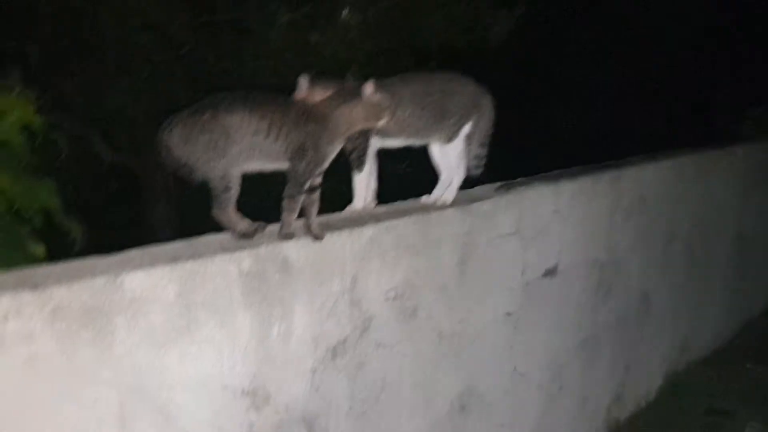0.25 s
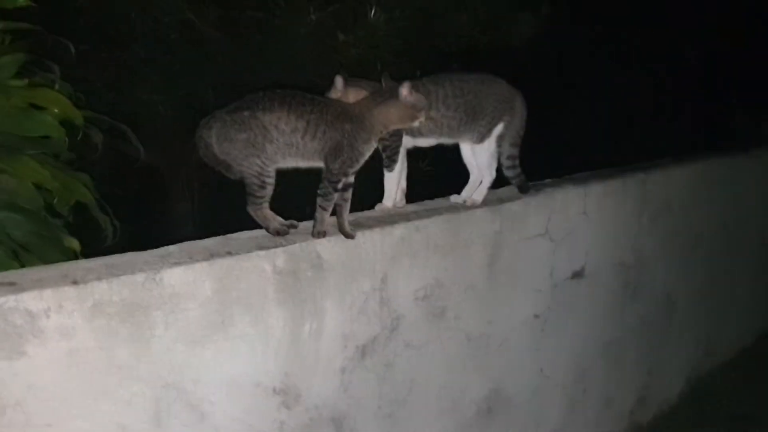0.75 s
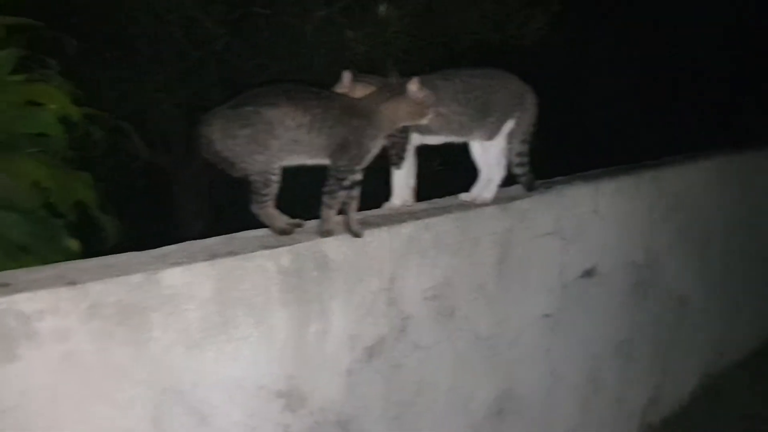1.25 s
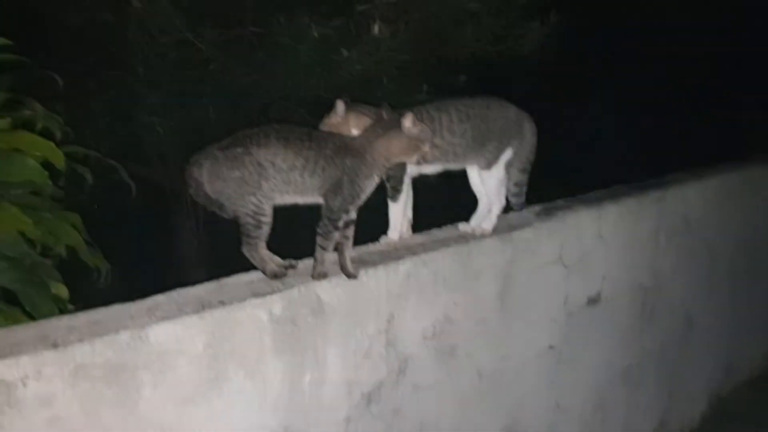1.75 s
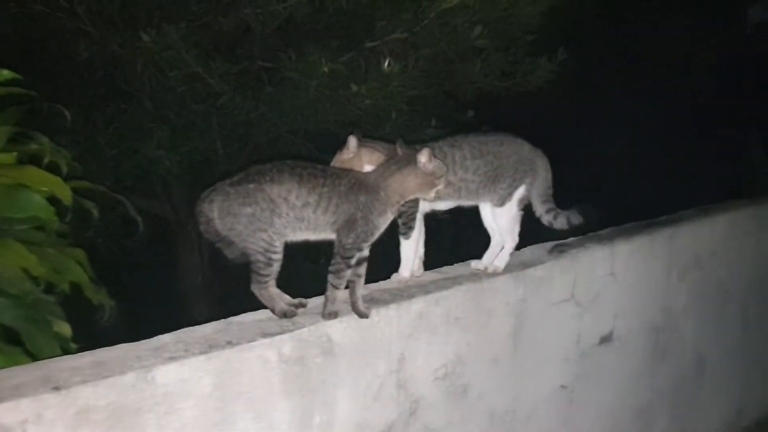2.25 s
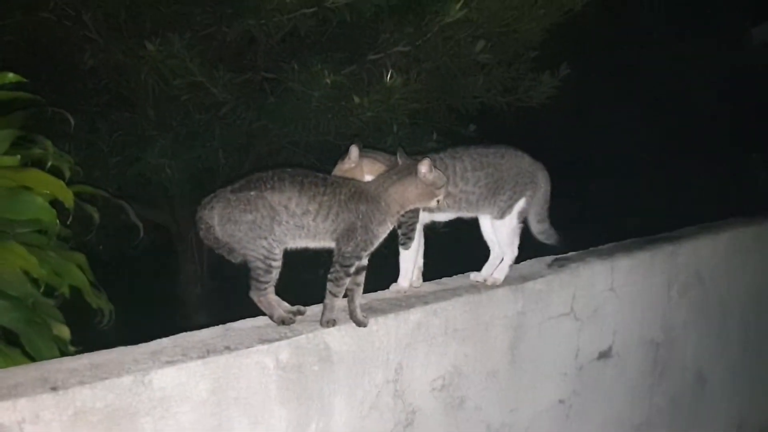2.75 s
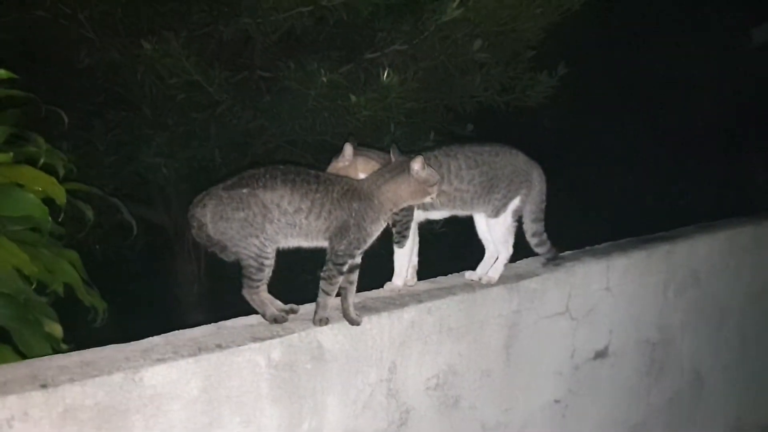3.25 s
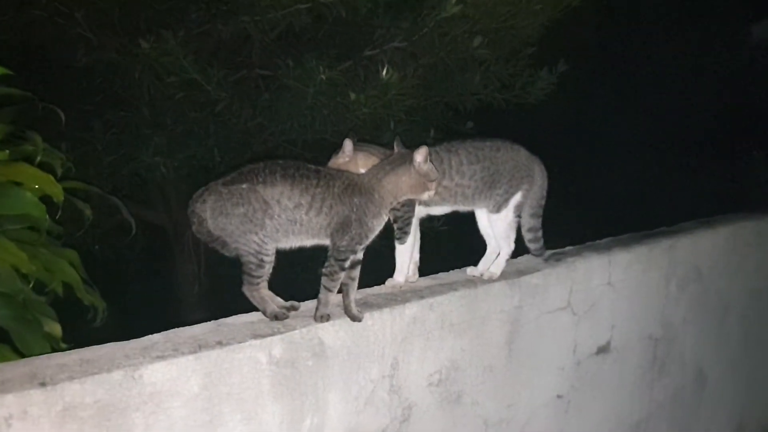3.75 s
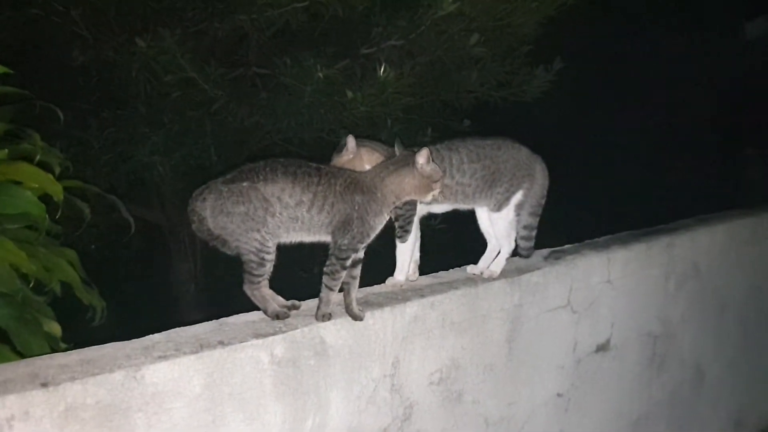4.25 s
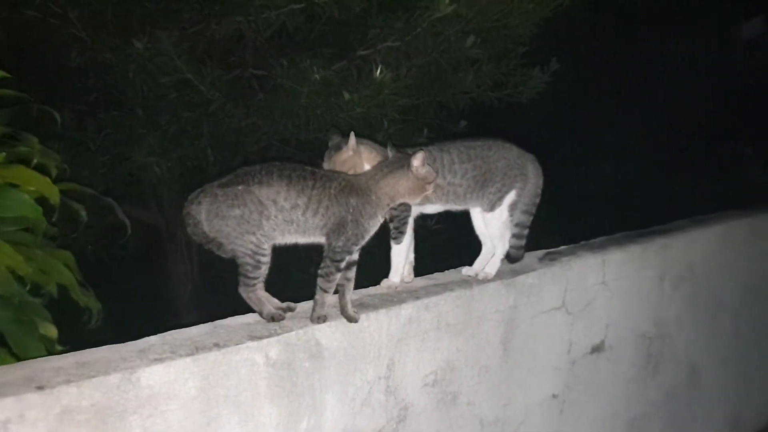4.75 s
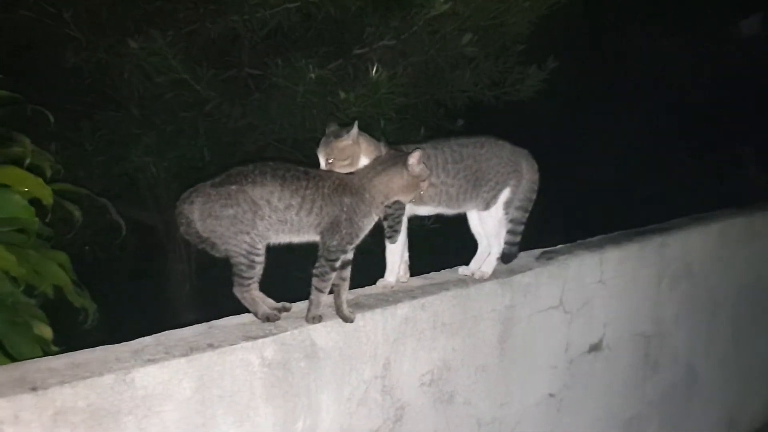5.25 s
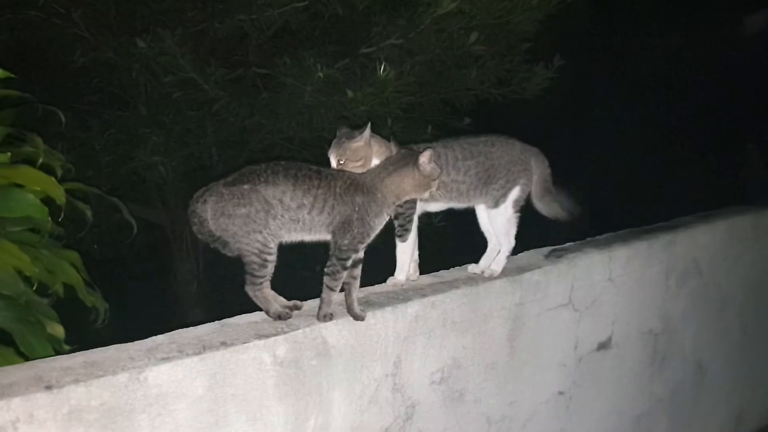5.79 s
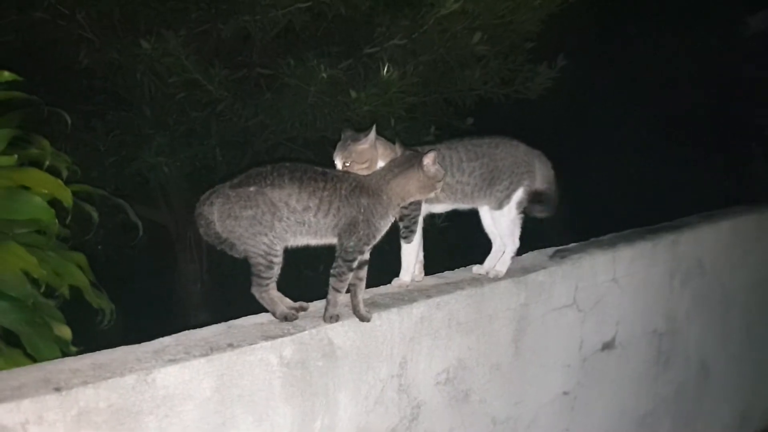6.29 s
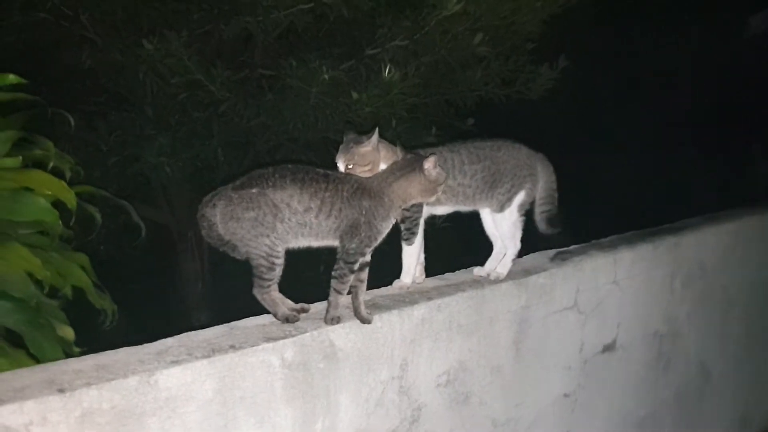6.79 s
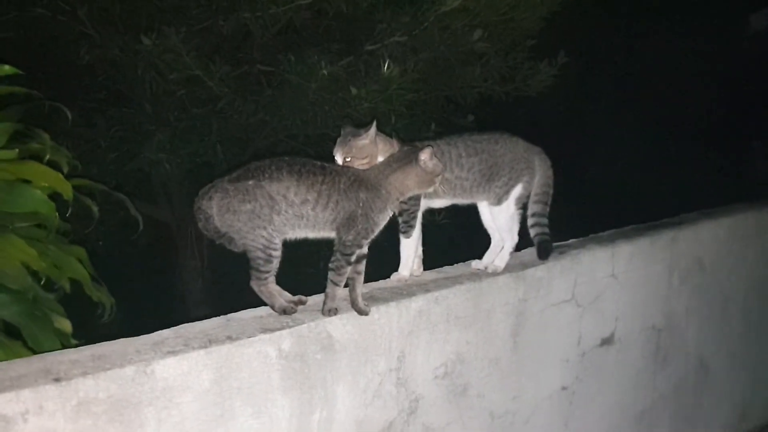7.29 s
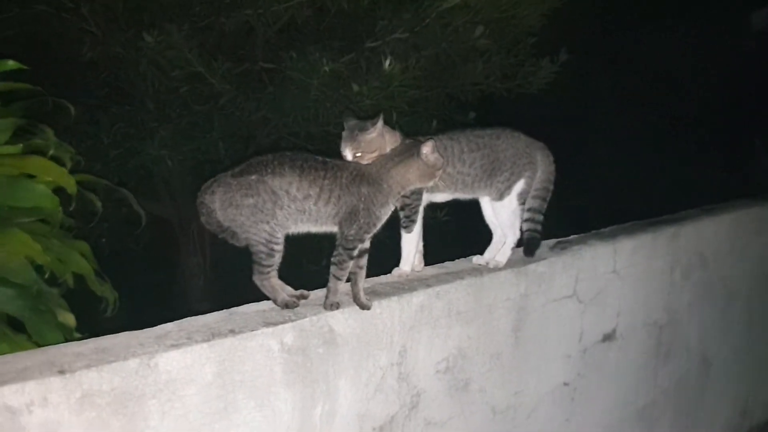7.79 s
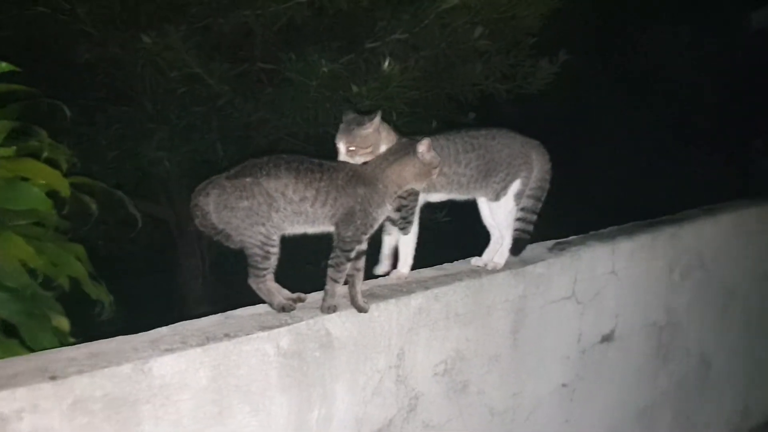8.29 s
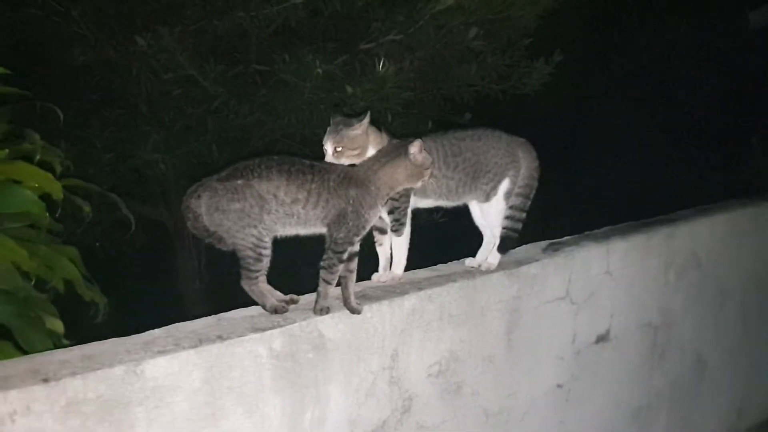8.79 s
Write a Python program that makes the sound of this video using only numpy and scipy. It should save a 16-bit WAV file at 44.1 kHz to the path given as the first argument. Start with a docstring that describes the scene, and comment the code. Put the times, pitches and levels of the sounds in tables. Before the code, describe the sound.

Two cats yowl at each other outdoors at night. After about a second of faint insects, far traffic rumble and two tiny mews, one cat gives three long calls that rise and sink in pitch, while the other overlaps with raspy, nearly level yowls. A frog croaks softly past the middle, and a few small ticks sound nearby. The microphone picks up a slight yard echo.

```python
"""Two cats yowl at each other at night in long, overlapping calls: one arches in pitch, one holds.
Their vocal folds give harmonics, lifted by throat and mouth resonances that rise with the pitch.
Behind them: insects over far traffic rumble, four double croaks from a frog's throat sac,
two faint mews and three ticks. A two-port microphone hears it all with the echoes of a yard."""
import sys
import numpy as np
from scipy import signal
from scipy.fft import rfft, irfft
from scipy.io import wavfile
from scipy.ndimage import uniform_filter1d

SR = 44100
rng = np.random.default_rng(int(sys.argv[2]) if len(sys.argv) > 2 else 0)


def unload_audio(sound):
    """Save the sound as a 16-bit wav file, at the path given as the first command line argument."""
    columns = np.transpose(np.atleast_2d(sound))
    # keep every value between -1 and 1, then stretch to whole-number steps
    steps = np.round(np.clip(columns, -1, 1) * 32767)
    wavfile.write(sys.argv[1], SR, steps.astype(np.int16))


N = 398223


def gain_of(db):
    """dB to amplitude factor."""
    return 10 ** (np.asarray(db) / 20)


def unit_rms(x):
    """Scale to rms 1."""
    return x / np.sqrt(np.mean(x ** 2) + 1e-20)


def at_hz(points, hz):
    """Interpolate (f/Hz, value) rows on a log-frequency axis."""
    f, value = np.transpose(points)
    return np.interp(np.log(hz + 1), np.log(f + 1), value)


def add(mix, start_s, sound):
    """Mix a sound in at start_s."""
    part = mix[round(start_s * SR):][:len(sound)]
    part += sound[:len(part)]


def resonance(hz, centre_hz, width_hz):
    """Peak of gain 1, falling to 1/2 at width_hz off centre."""
    return 1 / (1 + ((hz - centre_hz) / width_hz) ** 2)


def bandpass(x, band_hz, order=2):
    """Butterworth band-pass."""
    return signal.sosfilt(signal.butter(order, band_hz, "bandpass", fs=SR, output="sos"), x)


def wander(count, smooth_s):
    """Smooth random drift, rms 1."""
    span = max(int(smooth_s * SR), 2)
    return unit_rms(uniform_filter1d(uniform_filter1d(rng.standard_normal(count), span), span))


def glide(t, knots_s, value):
    """Cubic curve through the points, flat at each turn."""
    step = np.diff(value) / np.diff(knots_s)
    product = step[1:] * step[:-1]
    inner = np.where(product > 0, 2 * product / (step[1:] + step[:-1] + 1e-9), 0)
    slope = np.concatenate([step[:1], inner, step[-1:]])
    k = np.clip(np.searchsorted(knots_s, t) - 1, 0, len(step) - 1)
    span = knots_s[k + 1] - knots_s[k]
    u = (t - knots_s[k]) / span
    bend = (slope[k] - step[k]) * (1 - u) - (slope[k + 1] - step[k]) * u
    return value[k] + span * u * (step[k] + (1 - u) * bend)


def patchy_noise(gain, correlation, patchy_db):
    """Stereo noise, rms 1, shaped by gain (channel, bin, 1), with drifting patches of level."""
    a, b, c, d, patches = rng.standard_normal((N // 256 + 5, 513, 5)).T
    patches = unit_rms(uniform_filter1d(uniform_filter1d(patches, size=8, axis=0), size=14, axis=1))
    left = a + 1j * b
    right = correlation * left + np.sqrt(1 - correlation ** 2) * (c + 1j * d)
    spectra = np.array([left, right]) * gain * gain_of(patchy_db * patches)
    return unit_rms(signal.istft(spectra, nperseg=1024, noverlap=768)[1][:, :N])


def traffic_and_insects():
    """Far traffic rumble, its bass alike at both ports, and insect bands, independent at each."""
    # f/Hz, relative level/dB
    rumble_spectrum = [(30, -12.5), (52, -0.5), (80, -7), (125, -7), (250, -13.5), (420, -22), (800, -28.5),
                       (1700, -29), (4200, -35), (5500, -58)]
    # f/Hz, left-right correlation
    rumble_correlation = [(60, 0.96), (240, 0.94), (950, -0.078), (3770, -0.18), (15000, 0.24)]
    # f/Hz, width/Hz, relative level/dB, left minus right/dB
    choruses = [(5029, 300, 2, -7.5), (5288, 19, 8.5, -8), (7216, 875, -5, -4), (10050, 1040, -2, 0.5),
                (12050, 2770, -6, -2)]
    # t/s, relative insect level/dB, relative rumble level/dB
    swell = [(0, -50, -57), (.9, -46.5, -52), (1.6, -42, -49), (2.3, -48.5, -54.5), (4.6, -47, -55.5),
             (7.4, -49.5, -54.5), (7.9, -44.5, -53), (9.03, -48.5, -53.5)]
    knots_s, insects_db, rumble_db = np.transpose(swell)
    t = np.arange(N) / SR
    hz = np.fft.rfftfreq(1024, 1 / SR)[:, None]
    side = np.array([[[.5]], [[-.5]]])
    rumble_gain = gain_of(at_hz(rumble_spectrum, hz) + 1.5 * side)
    rumble = patchy_noise(rumble_gain, at_hz(rumble_correlation, hz), patchy_db=1.43)
    bands = sum(gain_of(db + pan_db * side) * resonance(hz, centre_hz, width_hz) ** 3.14
                for centre_hz, width_hz, db, pan_db in choruses)
    insects = patchy_noise(bands, correlation=0, patchy_db=.84)
    return (gain_of(6.5 + np.interp(t, knots_s, rumble_db)) * rumble
            + gain_of(3 + np.interp(t, knots_s, insects_db)) * insects)


def yard_echoes(x, t60_s):
    """Sparse reflections of random sign off walls and houses, different at each port."""
    delays = np.arange(300, SR // 2, 20) + rng.integers(0, 20, (2, (SR // 2 - 281) // 20))
    strengths = rng.choice([-1., 1.], delays.shape) * gain_of(-60 * delays / SR / t60_s)
    taps = np.zeros((2, SR // 2 + 40))
    np.put_along_axis(taps, delays, strengths, 1)
    return signal.fftconvolve(x[None], taps / np.linalg.norm(taps[0]), axes=1)[:, :N]


def mic_ports(x, pan_db, right_lag_s):
    """Sound reaches the right port later; the microphone body shades it more towards the treble."""
    hz = np.fft.rfftfreq(N, 1 / SR)
    left = gain_of(pan_db / 2 * np.minimum(hz / 2200, 1)) * np.exp(1j * np.pi * hz * right_lag_s)
    return irfft(rfft(x) * np.array([left, 1 / left]), N)


def far_mews(sag_hz_per_s=180, ends_db=-15):
    """Soft, slightly rough tones that sag, with husky breath above."""
    # peak t/s, rise/s, fall/s, f/Hz, tone/dB, breath/dB
    mews = [(.03, .03, 0.13, 720, -60, -56), (.76, 0.095, 0.12, 730, -49, -58)]
    mix = np.zeros(N)
    for peak_s, rise_s, fall_s, hz, tone_db, breath_db in mews:
        t = np.arange(-rise_s, fall_s, 1 / SR)
        pitch_hz = (hz - sag_hz_per_s * t) * (1 + .03 * wander(len(t), .004))
        tone = np.sqrt(2) * np.sin(2 * np.pi * np.cumsum(pitch_hz) / SR)
        breath = unit_rms(bandpass(rng.standard_normal(len(t)), [1400, 2500]))
        voice = gain_of(tone_db) * tone + gain_of(breath_db) * breath
        envelope = gain_of(ends_db * np.maximum(-t / rise_s, t / fall_s))
        add(mix, max(peak_s - rise_s, 0), voice * envelope)
    return mix


def ticks(decay_s=.007):
    """Soft snaps nearby: short bursts of band-passed noise."""
    # t/s, level before filtering/dB, f/Hz
    snaps = [(.405, -44, 800), (.999, -37, 2600), (8.405, -42, 900)]
    t = np.arange(0, .03, 1 / SR)
    mix = np.zeros(N)
    for start_s, db, hz in snaps:
        burst = rng.standard_normal(len(t)) * np.exp(-t / decay_s)
        add(mix, start_s, gain_of(db) * bandpass(burst, [hz / 2, hz * 1.7]))
    return mix


def frog(attack_s=.00184, tail_s=.046):
    """The throat sac rings in short, dull, throbbing bursts."""
    # t/s, level/dB, f/Hz, length/s, throb depth/0-1
    croaks = [(6.117, -34.5, 317, 0.11, 0.9), (6.186, -32.5, 260, 0.027, 0.55),
              (6.359, -30.5, 341, 0.035, 0.34), (6.456, -30, 286, 0.024, 0.05),
              (6.588, -32, 372, 0.044, 0.7), (6.683, -28, 310.4, 0.026, 0), (6.834, -29, 431, 0.11, 0.96),
              (6.933, -30, 323, 0.039, 0)]
    t = np.arange(0, .12, 1 / SR)
    mix = np.zeros(N)
    for at_s, db, hz, length_s, depth in croaks:
        envelope = np.clip(t / attack_s, 0, 1) * (np.exp(-(t / length_s) ** 4) + .2 * np.exp(-t / tail_s))
        throb_hz = rng.uniform(75.14, 80.75)
        throb = 1 - depth * (.5 + .5 * np.cos(2 * np.pi * throb_hz * t))
        pitch_hz = hz * (1 + .118 * wander(len(t), .0055))
        tone = np.sin(2 * np.pi * np.cumsum(pitch_hz) / SR)
        rasp = unit_rms(bandpass(rng.standard_normal(len(t)), [150, 650]))
        add(mix, at_s - .003, gain_of(db) * envelope * throb * (tone + .29 * rasp))
    return mix


def yowl(mix, columns, treble, *, throat, mouth, upper_db, upper_ratio, bright_share, treble_growth,
         jitter, shimmer_db, rasp, rasp_flare, breath_db):
    """Add one call: vocal-fold harmonics, lifted by throat and mouth, plus hissing air."""
    knots_s, pitch_hz, *levels_db = columns
    hop, fade_s = 32, .014
    t = np.arange(knots_s[0], knots_s[-1], 1 / SR)
    slow_t = t[::hop]
    hz = glide(slow_t, knots_s, pitch_hz)
    chest_db, throat_db, mouth_db, bright_db = (
        uniform_filter1d(np.interp(slow_t, knots_s, db), size=14) for db in levels_db)
    # throat, mouth: (base/Hz, rise per Hz of pitch, width/Hz)
    (throat_hz, throat_width_hz), (mouth_hz, mouth_width_hz) = (
        (base + rise * hz, width) for base, rise, width in (throat, mouth))
    harmonics_hz = np.arange(1, 19)[:, None] * hz
    throat_gain = gain_of(throat_db) * resonance(harmonics_hz, throat_hz, throat_width_hz)
    mouth_gain = gain_of(mouth_db) * resonance(harmonics_hz, mouth_hz, mouth_width_hz) ** 1.13
    loudness = np.sqrt((mouth_gain ** 2).sum(0))
    treble_gain = gain_of(bright_share * bright_db) * loudness * (10 * loudness) ** treble_growth
    upper = resonance(harmonics_hz, upper_ratio * mouth_hz, width_hz=494) ** 2  # next mouth resonance
    gains = throat_gain + mouth_gain + treble_gain * gain_of(at_hz(treble, harmonics_hz))
    gains += loudness * gain_of(upper_db + bright_db) * upper
    gains[0] = gain_of(chest_db)  # the fundamental sounds through the chest
    cycles = np.cumsum(np.interp(t, slow_t, hz) * (1 + jitter * wander(len(t), .0097))) / SR
    voice = 0
    for k, gain in enumerate(gains, 1):
        shimmer = gain_of(shimmer_db * np.interp(t, slow_t, wander(len(slow_t), .02 / hop)))
        voice += np.interp(t, slow_t, gain) * shimmer * np.sin(2 * np.pi * (k * cycles + rng.random()))
    # uneven cycle strength: a haze around each harmonic
    rasp_depth = rasp * np.interp(t, slow_t, gain_of(rasp_flare * bright_db))
    voice *= 1 + rasp_depth * wander(len(t), .00074)
    hiss = unit_rms(bandpass(rng.standard_normal(len(t)), [3700, 5300], order=3))
    breath = gain_of(breath_db) * np.interp(t, slow_t, uniform_filter1d(treble_gain, size=200)) * hiss
    fade = np.clip(np.minimum(t - knots_s[0], knots_s[-1] - t) / fade_s, 0, 1)
    add(mix, knots_s[0], (np.sqrt(2) * voice + breath) * fade)


def holding_cat():
    """Raspy, breathy yowls on a nearly level pitch; brighter when louder."""
    # per call: t/s, f/Hz, chest/dB, throat/dB, mouth/dB, brightness/dB
    calls = [
        [(1.32, 470, -37, -36, -57, 16), (1.4, 585, -51, -19, -55, -1), (1.46, 599, -57, -25.5, -38.5, 1.5),
         (1.67, 663, -53.0, -24, -38.5, 3.0), (1.78, 677.5, -53.5, -57, -43, -15),
         (2.31, 650.4, -55, -25.5, -37, 1), (2.48, 608.4, -47, -20, -47, -2), (2.58, 530, -52, -28, -70, 16)],
        [(2.57, 611, -54, -22, -59, 0), (2.76, 582, -55, -58, -70, 4), (2.97, 564.6, -55.0, -36.5, -57.5, -9),
         (3.42, 556, -53, -37, -61.5, -4), (3.47, 522, -46, -17.5, -67, 6),
         (3.55, 582.0, -64.0, -29, -47.5, 5.5), (3.68, 622, -61, -25, -40, -10),
         (3.88, 652, -54, -29, -35.5, -4.5), (4.16, 653, -53.5, -25.5, -34.5, -2.5),
         (4.31, 660.5, -51.0, -28, -35.5, 1), (4.4, 698, -45.5, -34, -39, 2), (4.52, 715, -44, -16.5, -32.5, 9),
         (4.71, 688, -43.0, -34, -30.5, -4.0), (4.8, 681, -43.5, -33, -31, -12),
         (4.96, 615, -54, -27, -45.0, 10)],
        [(5.36, 449, -37, -34, -51, 7), (5.44, 578, -61, -33, -47, 3), (5.55, 638, -54, -33, -38, 1),
         (5.62, 635.3, -51.0, -29, -38.0, 5.5), (5.79, 589, -61.0, -30, -46.5, 6),
         (6.05, 577.0, -58, -28, -58, 18), (6.18, 618.0, -56, -26, -44.5, 9),
         (6.36, 656, -47.5, -56, -34.5, -13), (6.77, 660.4, -47.0, -71, -34, -17.5),
         (6.99, 640, -48.0, -35, -36, -4.5), (7.17, 619, -52, -34, -36.0, -4.0),
         (7.2, 571, -64, -51, -29.5, -14), (7.23, 640, -48.5, -32, -44, 10),
         (7.4, 628, -52.5, -28, -36.5, -2.5), (7.52, 674.0, -45.5, -35, -34.5, -4),
         (7.67, 689.4, -44.0, -25, -39.5, 10), (7.77, 689, -43.0, -30, -27.5, -16),
         (7.83, 699, -43, -22, -23, -16), (7.95, 686, -40.5, -23, -26, -4.5),
         (8.03, 704.0, -42.0, -18, -22.5, -25), (8.07, 688, -41.5, -24, -26.5, -18),
         (8.15, 697, -41, -21, -27, -10.0), (8.28, 667.4, -42, -27, -34, 1), (8.43, 562, -63.0, -33, -58.5, 15)],
    ]
    # overtones above the mouth resonance: f/Hz, relative level/dB
    treble = [(2250, -21), (2650, -11), (3300, -33), (4200, -12), (4900, -8.5), (6100, -11), (9100, -58)]
    mix = np.zeros(N)
    for rows in calls:
        yowl(mix, np.transpose(rows), treble, throat=(130, 1.45, 100), mouth=(200, 2.62, 200),
             upper_db=-3.5, upper_ratio=1.294, bright_share=.13, treble_growth=1,
             jitter=.0063, shimmer_db=2, rasp=.075, rasp_flare=.2, breath_db=-13)
    return mix


def arching_cat(flare_db_per_octave_per_s=3, max_flare_db=9, bounce_s=.00454, bounce_db=-7.5):
    """Cleaner yowls that flare as the pitch climbs and mellow as it sinks, with a ground bounce."""
    # per call: t/s, f/Hz, throat/dB, mouth/dB
    calls = [
        [(1.15, 246.0, -51.5, -67), (1.37, 374.5, -35.5, -45), (1.55, 472, -22.0, -43),
         (1.74, 615.3, -34.5, -17.5), (1.85, 696, -33.0, -14), (1.96, 706.2, -28.5, -18.5),
         (2.08, 693.2, -28.5, -18), (2.21, 650.7, -36.5, -21.5), (2.38, 548.0, -34.5, -36),
         (2.61, 468, -30.5, -40), (2.8, 427, -34.0, -59), (2.91, 411.5, -37.0, -73), (3.03, 355, -42.5, -78),
         (3.24, 292.5, -49.5, -85)],
        [(4.13, 227.5, -55, -77), (4.16, 282.4, -48.5, -50), (4.25, 465.7, -27.5, -35), (4.32, 538, -28.5, -39),
         (4.4, 554, -32.0, -33.5), (4.62, 536.4, -35.0, -26), (4.71, 586.3, -36.5, -20), (4.8, 643, -42, -15),
         (4.92, 726.2, -31.0, -21), (5.03, 739.7, -32.0, -19), (5.15, 759.8, -35.5, -14.0),
         (5.33, 739, -31.5, -21), (5.49, 666.7, -31.5, -23), (5.65, 504.4, -30.5, -44.5),
         (5.9, 393, -37.5, -54), (6.18, 306.0, -47.5, -69)],
        [(6.75, 271, -50, -62), (6.85, 390.0, -29.5, -36.5), (6.95, 450, -32, -32), (7.15, 438.0, -30.5, -50),
         (7.26, 396.7, -36.5, -54), (7.56, 354.5, -44, -61), (7.7, 320.6, -44.5, -56), (7.88, 362.0, -36, -57),
         (7.98, 495, -28, -31), (8.1, 596, -43, -19.5), (8.2, 681.4, -32.5, -16), (8.44, 691.7, -25.5, -20),
         (8.6, 647, -33, -23), (8.67, 595, -31.5, -31.5), (8.82, 444.6, -29, -46.5), (8.95, 333, -53, -55.0)],
        [(8.96, 299, -38, -58), (9.02, 362, -32, -51)],
    ]
    # overtones above the mouth resonance: f/Hz, relative level/dB
    treble = [(2350, -74), (3050, -55), (3700, -39), (4300, -30), (4900, -43), (5650, -24.5), (6200, -25),
              (7000, -35.5), (8500, -55), (9500, -63)]
    # chest tone by pitch: f/Hz, level re throat/dB
    chest = [(240, 15), (310, -9), (400, -17), (550, -11.5), (690, -30), (750, -12)]
    mix = np.zeros(N)
    for rows in calls:
        knots_s, hz, throat_db, mouth_db = np.transpose(rows)
        octaves_per_s = np.gradient(np.log2(hz), knots_s)
        bright_db = np.clip(flare_db_per_octave_per_s * octaves_per_s, -max_flare_db, max_flare_db)
        columns = knots_s, hz, throat_db + at_hz(chest, hz), throat_db, mouth_db, bright_db
        yowl(mix, columns, treble, throat=(456, 1.304, 152), mouth=(407, 2.481, 216),
             upper_db=-19, upper_ratio=1.525, bright_share=.45, treble_growth=-.3,
             jitter=.0018, shimmer_db=1.5, rasp=.02, rasp_flare=1.2, breath_db=-43)
    add(mix, bounce_s, gain_of(bounce_db) * mix)
    return mix


def scene():
    """Cats, frog and small sounds in the yard, over traffic and insects."""
    arching = arching_cat()
    holding = holding_cat()
    small = frog() + ticks() + far_mews()
    direct = mic_ports(arching, pan_db=3.6, right_lag_s=6e-5)
    direct += mic_ports(holding, pan_db=1, right_lag_s=7e-5)
    direct += small * gain_of([[.8], [-.8]])
    echoes = gain_of(-17) * yard_echoes(arching + holding + small, t60_s=.35)
    return direct + echoes + traffic_and_insects()


def record(dry):
    """Microphone bass roll-off, then the band limit."""
    low_hz, high_hz = 45, 15200
    thin = signal.sosfilt(signal.butter(6, low_hz, "highpass", fs=SR, output="sos"), dry)
    lowpass = signal.firwin(511, high_hz, window=("kaiser", 9), fs=SR)
    return signal.oaconvolve(thin, lowpass[None], "same")


dry = scene()
out = record(dry)
unload_audio(out)
```